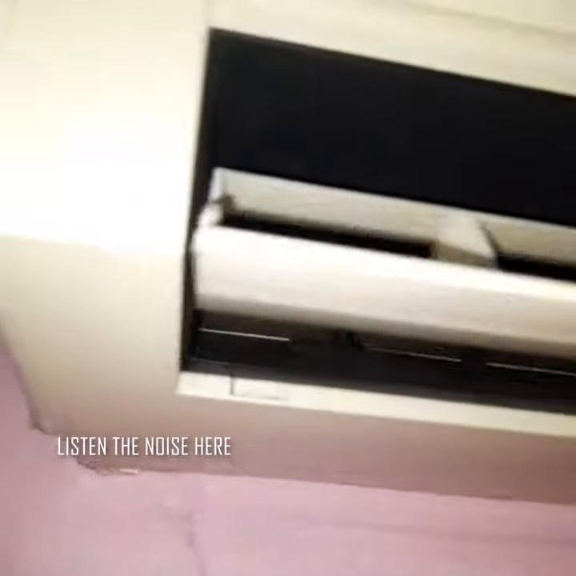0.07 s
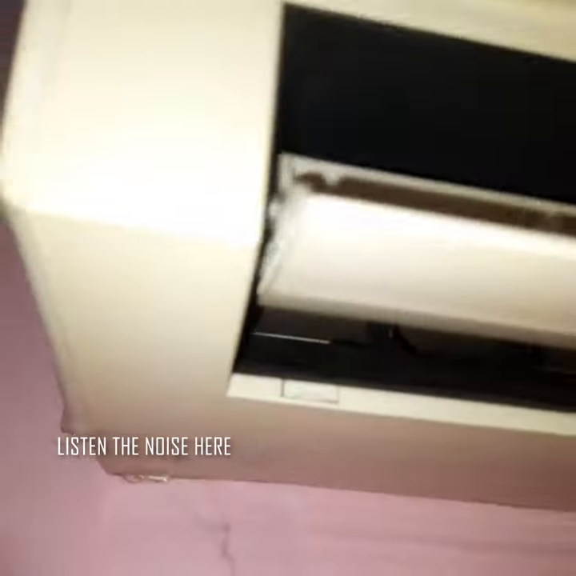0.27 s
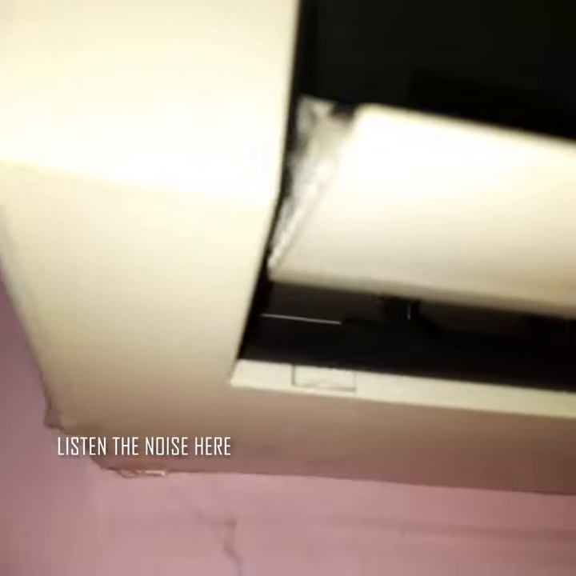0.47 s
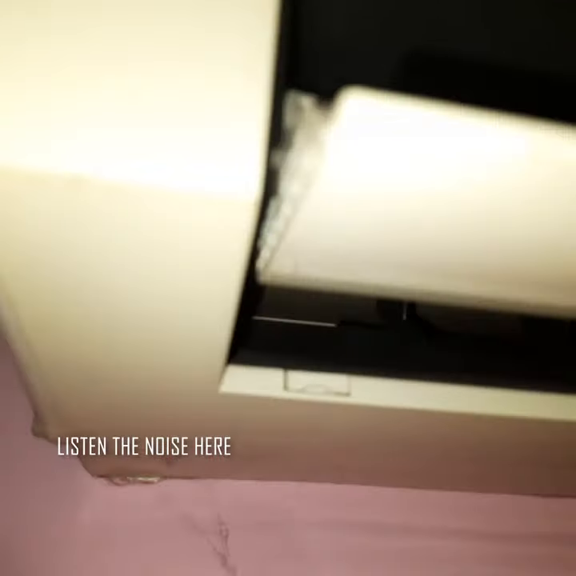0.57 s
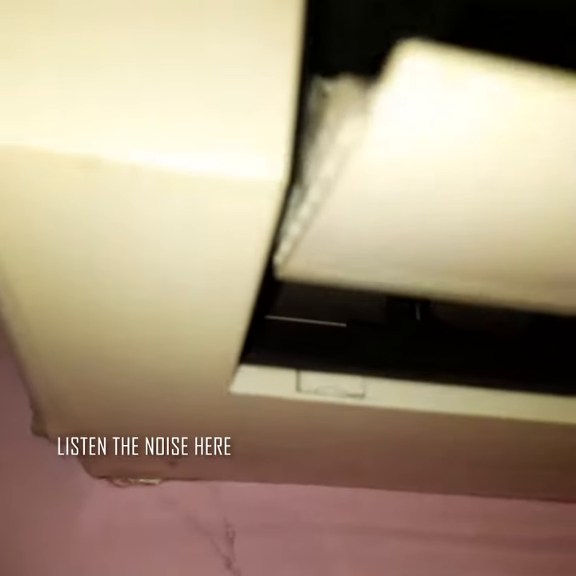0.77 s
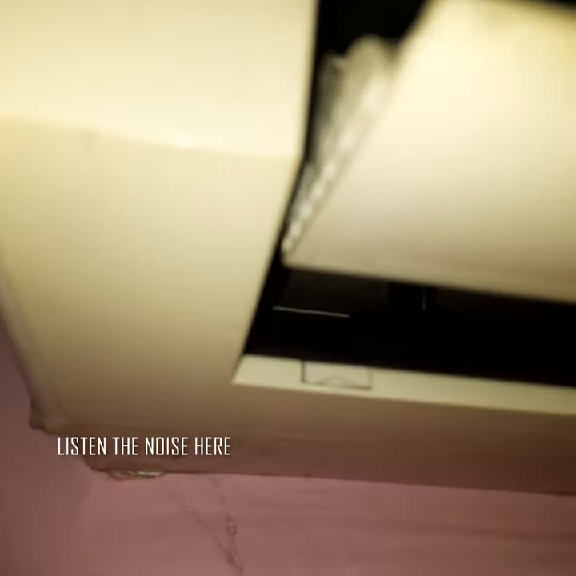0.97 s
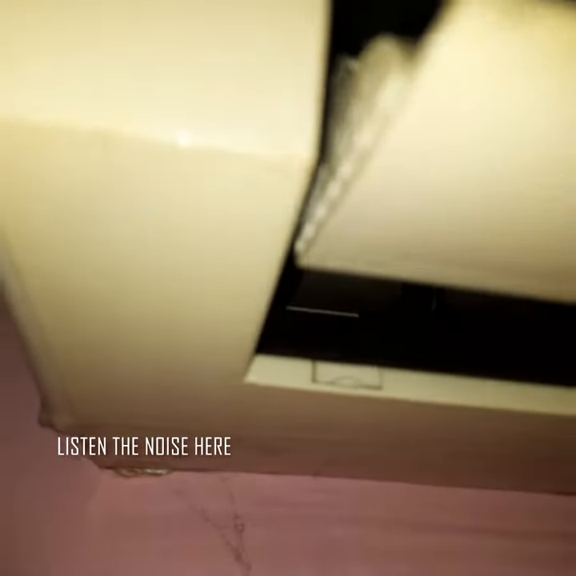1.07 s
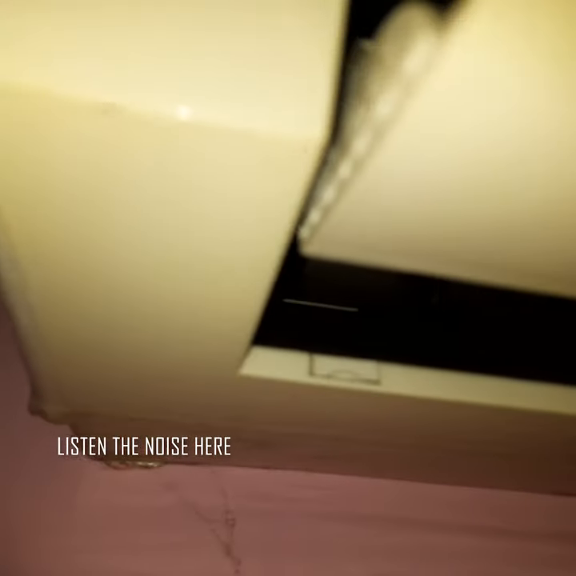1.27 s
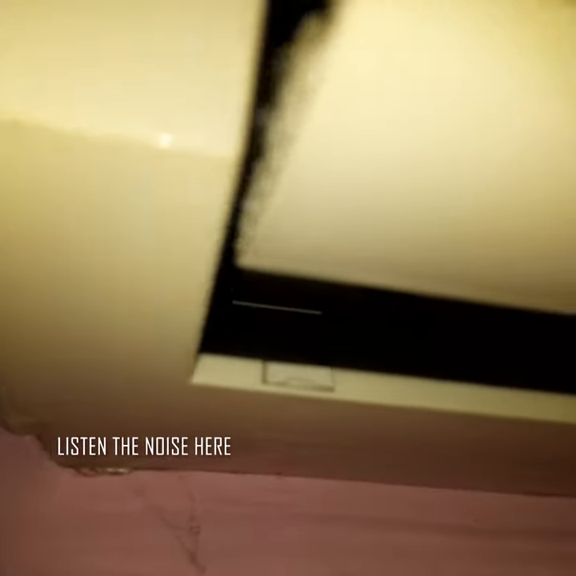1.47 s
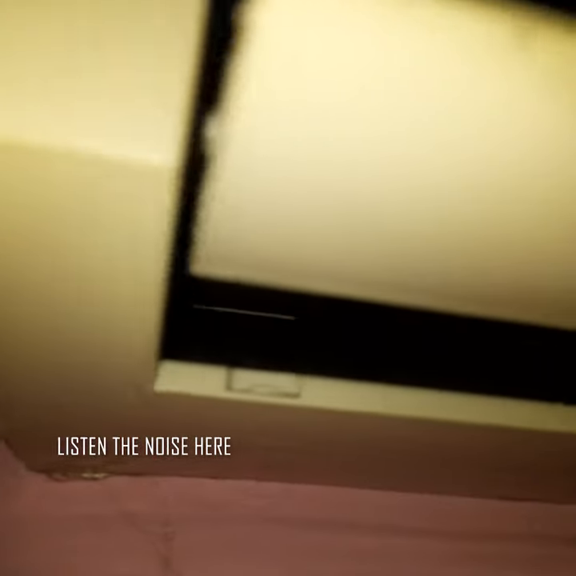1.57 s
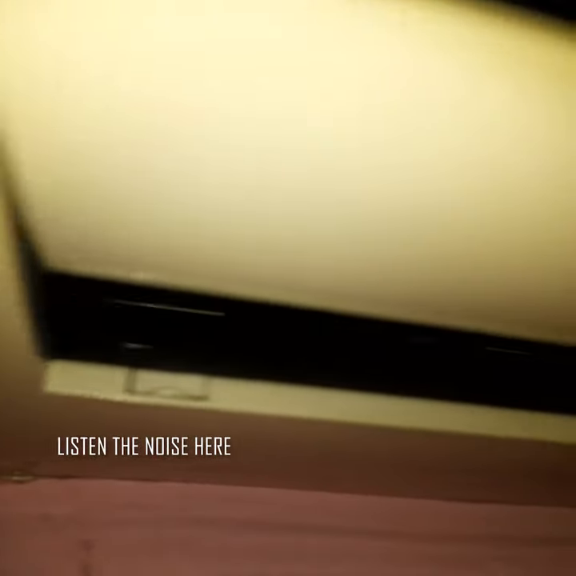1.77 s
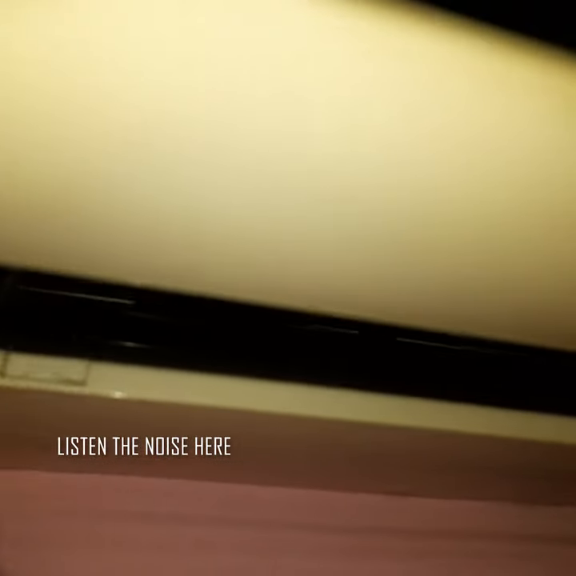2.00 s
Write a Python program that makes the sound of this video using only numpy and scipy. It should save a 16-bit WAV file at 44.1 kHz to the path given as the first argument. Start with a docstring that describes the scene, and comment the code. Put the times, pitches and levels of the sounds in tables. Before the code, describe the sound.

Airflow from a wall air conditioner hisses and rumbles as its closing louver ticks faintly.

```python
"""Air conditioner louver closing

A phone sits close to the outlet of a wall air conditioner while its louver swings shut.
The fan's air hisses and its housing drones. The draught hits the two microphone openings
(ports) separately, so each rumbles and flutters; the phone's wind filter briefly cuts the
bass at times. The louver's plastic gear ticks faintly."""
import sys
import numpy as np
from scipy import signal
from scipy.fft import rfft, irfft
from scipy.io import wavfile
from scipy.ndimage import uniform_filter1d

SR = 44100
rng = np.random.default_rng(int(sys.argv[2]) if len(sys.argv) > 2 else 0)


def put_to_file(sound):
    """Save the sound as 16-bit audio at rate SR, in the file named by the first command-line argument."""
    columns = np.atleast_2d(sound).T  # one column per channel
    safe = np.clip(columns, -1, 1)
    whole_steps = np.round(safe * 32767)
    wavfile.write(sys.argv[1], SR, whole_steps.astype(np.int16))


N = 89875
PORT_LAG_S = .0005  # sound reaches the left port this much later


def gain(db):
    return 10 ** (np.asarray(db) / 20)


def curve(table, column=1):
    """Join a table's points with straight lines over time."""
    table = np.array(table, float)
    return np.interp(np.arange(N) / SR, table[:, 0], table[:, column])


def colour(noise, tone):
    """Give noise the tone of an (f/Hz, level/dB) table, at an average (rms) size of 1."""
    tone, hz = np.array(tone, float), np.arange(N // 2 + 1) * SR / N + 1
    level_db = np.interp(np.log(hz), np.log(tone[:, 0]), tone[:, 1], left=-60)
    shaped = irfft(rfft(noise) * gain(level_db), N)
    return shaped / np.sqrt(np.mean(shaped ** 2))


def wobble(per_s, channels=2):
    """Glide between random values, roughly -1 to 1, per_s times a second."""
    hold = int(SR / per_s)
    steps = np.repeat(rng.standard_normal((channels, N // hold + 1)), hold, axis=1)
    return 1.1 * uniform_filter1d(uniform_filter1d(steps, hold), hold)[:, :N]


def stereo_noise(shared, lag_s):
    """Left and right noise with a shared part that comes lag_s later on the left."""
    both, own = rng.standard_normal(N), rng.standard_normal((2, N))
    common = np.array([np.roll(both, int(lag_s * SR)), both])
    return np.sqrt(shared) * common + np.sqrt(1 - shared) * own


def add(out, start_s, sound):
    """Mix a sound in at start_s."""
    i = max(int(start_s * SR), 0)
    out[..., i:i + sound.shape[-1]] += sound[..., :N - i]


def pan(db):
    """Two gains that make the left db louder than the right."""
    return gain(np.array([db, -db]) / 2)


# Tone of the hiss: f/Hz, level/dB
HISS_TONE = [(300, -30), (600, -4), (900, 0), (1300, -7), (2000, -10), (3100, -15), (3500, -23),
             (4500, -23), (5800, -27.5), (7000, -29.5), (8200, -34), (9200, -43), (10200, -49),
             (15800, -50)]
# How loud the hiss is: t/s, level/dB
HISS_LEVEL = [(0, -51.5), (.3, -48.5), (.9, -47), (1.4, -47), (1.55, -44.5), (1.8, -42.5), (2.04, -44)]

def air_hiss(treble_hz=6500, left_cut_db=4):
    """The fan's air hisses out of the outlet, a little duller on the left."""
    noise = stereo_noise(shared=.35, lag_s=PORT_LAG_S)
    flicker_db = 1.24 * wobble(30.1, channels=1) + 2.0 * wobble(180)
    hiss = colour(noise * gain(flicker_db), HISS_TONE)
    treble = signal.butter(2, treble_hz * np.array([.6, 1.35]), "bandpass", fs=SR, output="sos")
    hiss[0] -= (1 - gain(-left_cut_db)) * signal.sosfiltfilt(treble, hiss[0])
    return hiss * gain(curve(HISS_LEVEL))


# Tone of the fan housing: f/Hz, level/dB
HOUSING_TONE = [(200, -20), (260, -6), (325, 0), (390, -5), (480, -10), (700, -18), (810, -12), (920, -22),
                (2000, -100)]
# How loud it drones: t/s, level/dB
HOUSING_LEVEL = [(0, -46), (.5, -48), (.78, -44), (.85, -46), (.905, -40), (.95, -45), (1.3, -43.5),
                 (1.52, -43), (2.04, -42)]

def housing_drone():
    """The fan housing gives a hollow hum at a few hundred Hz, much alike on both sides."""
    noise = stereo_noise(shared=.81, lag_s=PORT_LAG_S)
    flicker_db = .42 * wobble(40.8, channels=1)
    return colour(noise * gain(flicker_db), HOUSING_TONE) * gain(curve(HOUSING_LEVEL))


# Tone of the rumble: f/Hz, level/dB
RUMBLE_TONE = [(20, -20), (35, -9), (55, -1), (110, 0), (180, -3.5), (240, -5), (290, -9), (380, -25),
               (800, -100)]
# How loud it is between dips: t/s, left level/dB, right level/dB
RUMBLE_LEVEL = [(0, -33, -20), (.12, -39, -33.5), (.3, -30, -32), (.5, -36.5, -39.5), (.62, -31.5, -36.5),
                (.85, -35, -41), (1.15, -33, -35), (1.3, -35.5, -28.5), (1.5, -31.5, -35),
                (1.66, -26.5, -27), (1.8, -28.5, -23.5), (1.88, -31, -26.5), (1.95, -49, -26),
                (2.04, -29, -17.5)]
# When the phone's wind filter cuts the bass: t/s, length/s, port (0 left, 1 right)
BASS_DIPS = [(0.034, 0.1, 0), (0.147, 0.041, 0), (0.18, 0.035, 0), (0.291, 0.11, 0), (0.516, 0.034, 0),
             (1.419, 0.031, 0), (1.676, 0.057, 0), (1.874, .108, 0), (0.536, 0.02, 1), (0.894, 0.065, 1),
             (1.17, 0.03, 1), (1.214, 0.044, 1), (1.3, 0.073, 1), (1.456, 0.011, 1), (1.497, .028, 1),
             (1.573, 0.03, 1)]

def draught_rumble(dip_db=-18, fade_s=.006):
    """The draught rumbles on each port; the phone's wind filter briefly cuts the bass now and then."""
    noise = stereo_noise(shared=.29, lag_s=0)
    lumps_db = 2.5 * wobble(65)
    rumble = colour(noise * gain(lumps_db), RUMBLE_TONE)
    dipping = np.zeros((2, N))
    for start_s, length_s, port in BASS_DIPS:
        add(dipping[port], start_s, np.ones(int(length_s * SR)))
    dipping = uniform_filter1d(np.minimum(dipping, 1), int(fade_s * SR))
    level_db = np.array([curve(RUMBLE_LEVEL, column=1), curve(RUMBLE_LEVEL, column=2)])
    return rumble * gain(level_db + dip_db * dipping)


# Tone of the swirling air: f/Hz, level/dB
SWIRL_TONE = [(170, -24), (240, -3), (340, 0), (480, -5.5), (650, -12.5), (1300, -25), (2500, -42),
              (5000, -90)]
# How loud it is: t/s, level/dB, left minus right/dB
SWIRL_LEVEL = [(0.0, -34, -2), (0.04, -36, 0), (0.07, -43, 6), (0.15, -41, 0), (0.2, -45, 0),
               (0.57, -45, 1), (0.8, -41, 0), (1.0, -43, 1), (1.36, -41, 1), (1.41, -37, 1),
               (1.445, -40, 0), (1.46, -50, 0), (1.48, -37, -2), (1.6, -38, 1), (1.74, -38, 3),
               (1.82, -34, 2), (1.88, -33.5, 8), (1.91, -38, 3), (1.94, -34.5, 6), (2.04, -36, 6)]

def swirl_flutter():
    """Small swirls in the draught flutter at a pitch above the rumble."""
    noise = stereo_noise(shared=.4, lag_s=.0001)
    flicker_db = .5 * wobble(70, channels=1) + .6 * wobble(98)
    swirls = colour(noise * gain(flicker_db), SWIRL_TONE)
    return swirls * gain(curve(SWIRL_LEVEL)) * pan(curve(SWIRL_LEVEL, column=2))


# Puffs of air: t/s, level/dB, left minus right/dB, f/Hz
AIR_PUFFS = [(.032, -36, 5, 870), (.068, -42.5, -5, 890), (.084, -34.5, 5, 1070), (0.09, -41, 8, 1670),
             (.121, -40, -8, 870), (.162, -37.5, -1.5, 726), (.841, -48, 8, 1300), (0.876, -41.5, -4, 850),
             (.892, -40.5, 5, 940), (1.361, -37.5, 4, 1180), (1.527, -41.5, 1, 1480),
             (1.846, -27.5, 3, 495), (1.868, -25.5, 11, 510), (1.886, -30, 8, 950),
             (1.918, -29.5, 5.5, 530), (1.941, -29.5, 13.5, 640), (1.955, -33.5, 5, 1060),
             (2.01, -29.5, 16, 730)]

def puffs(rise_s=.0045):
    """Air brushes across a port's edge in short, rough bursts."""
    out, t = np.zeros((2, N)), np.arange(int(.018 * SR)) / SR
    swell = t / rise_s * np.exp(1 - t / rise_s)
    for at_s, db, pan_db, hz in AIR_PUFFS:
        band = signal.butter(1, hz * np.array([.4, 1.8]), "bandpass", fs=SR, output="sos")
        puff = signal.sosfilt(np.vstack([band] * 3), rng.standard_normal((2, len(t))))
        puff /= np.sqrt(2) * puff.std()
        add(out, at_s - .003, gain(db) * puff * swell * pan(pan_db)[:, None])
    return out


# Thumps of air: t/s, level/dB, f/Hz, port (0 left, 1 right)
AIR_THUMPS = [(0.036, -14, 136, 0), (.115, -16, 97, 1), (0.117, -26.5, 115, 0), (0.156, -16.5, 157, 1),
              (0.168, -17.5, 211, 0), (0.213, -20, 114, 0), (0.274, -22, 96.5, 0), (0.396, -25.5, 113, 0),
              (0.423, -28, 135, 1), (0.483, -25, 97, 1), (0.551, -24, 98.6, 0), (0.588, -29, 138, 0),
              (0.609, -20.5, 161, 1), (0.607, -26, 129, 0), (0.679, -22, 111, 1), (0.681, -24.5, 95.5, 0),
              (0.762, -28, 131, 0), (.762, -23.5, 138, 1), (.816, -27, 198, 1), (0.93, -26.5, 112, 0),
              (1.056, -31, 124, 1), (1.155, -25, 106, 0), (1.156, -24.5, 118, 1), (1.382, -24, 98, 0),
              (1.401, -22.5, 227, 1), (1.49, -31, 131, 1), (1.568, -36, 112, 1), (1.575, -21, 124, 0),
              (1.645, -21, 159, 0), (1.741, -20.5, 110, 1), (1.762, -24.5, 101, 0), (1.804, -15.5, 115, 1),
              (1.802, -18.5, 109, 0), (1.817, -18, 96, 0), (1.821, -22, 120, 1), (1.851, -24.5, 145, 1),
              (1.862, -22, 139, 0), (1.864, -12, 110, 1), (1.879, -18, 87, 1), (1.881, -23.5, 91, 0),
              (1.893, -16, 100, 1), (2.012, -20, 134, 1), (2.02, -29, 109, 0), (2.025, -41, 88, 1)]

def thumps(width_cycles=.36):
    """The draught shoves one port: a single low swing of pressure."""
    out = np.zeros((2, N))
    phases = .018 * rng.standard_normal(len(AIR_THUMPS))
    for (at_s, db, hz, port), phase in zip(AIR_THUMPS, phases):
        cycles = np.arange(-1.5 * SR / hz, 1.5 * SR / hz) * hz / SR
        swell = np.exp(-.5 * (cycles / width_cycles) ** 2)
        wave = np.sqrt(2) * np.sin(2 * np.pi * (cycles + phase))
        add(out[port], at_s - 1.57 / hz, gain(db) * swell * wave)
    return out


def ring(push, hz, ring_s):
    """A pushed part rings at one pitch, fading 60 dB in ring_s; its peak is 1."""
    decay = np.exp(-np.log(1000) / (ring_s * SR))
    feedback = [1, -2 * decay * np.cos(2 * np.pi * hz / SR), decay * decay]
    note = signal.lfilter([1, 0, -1], feedback, push)
    return note / np.abs(note).max()


# Slips of the gear: t/s, level/dB, boost for the flap's edge/dB
GEAR_SLIPS = [(0.101, -66, -11), (0.3703, -51, 7), (0.5382, -57, -10), (0.5546, -57, 4), (0.675, -53, -6),
              (0.6953, -51.5, -16), (0.7841, -50, -14), (0.834, -62, 16.5), (.973, -61, -12),
              (1.03, -62, -8), (1.067, -52, 4), (1.1109, -52, 4), (1.2321, -57, 9), (1.362, -52.5, -8),
              (1.5672, -44.5, 3), (1.7602, -42, 3.5), (1.9495, -49.5, 14.5)]
# Notes the flap's body rings at: f/Hz, level/dB, ring time/s
FLAP_NOTES = [(1200, 5, .015), (2000, 4, .012), (2700, 1.5, .01), (3400, -4, .008), (4600, -3.5, .008),
              (5600, -10, .004), (7100, -9, .004), (8100, -11, .004), (10500, -29, .003)]

def louver_ticks(scrape_s=.0055, snap_s=.002, low_delay_s=.003, top_hz=10000):
    """Each gear slip snaps the louver flap's edge and scrapes its body, whose lower notes come late."""
    out, t = np.zeros((2, N)), np.arange(int(.08 * SR)) / SR
    for slip_s, db, edge_db in GEAR_SLIPS:
        *own_scrape, shared_scrape, snap = rng.standard_normal((4, len(t))) * np.exp(-t / scrape_s)
        edge = gain(edge_db - 3) * ring(snap * np.exp(-t / snap_s), hz=6390, ring_s=.009)
        for port, at_s in enumerate([slip_s + PORT_LAG_S, slip_s]):
            add(out[port], at_s, gain(db) * edge)
            for hz, note_db, ring_s in FLAP_NOTES:
                note = ring(own_scrape[port] + shared_scrape, hz, ring_s)
                if hz < 3000:  # a second pass makes the lowest notes purer
                    note = ring(note, hz, ring_s / 2)
                add(out[port], at_s + low_delay_s * (hz < 5000), gain(db + note_db) * note)
    return signal.sosfilt(signal.butter(2, top_hz, fs=SR, output="sos"), out)


def scene():
    """The fan, its draught on the ports and the louver, all together."""
    fan = air_hiss() + housing_drone()
    draught = draught_rumble() + thumps() + swirl_flutter() + puffs()
    return fan + draught + louver_ticks()


def record(dry):
    """The phone cuts off the highest treble."""
    top_hz = 15700
    return signal.sosfilt(signal.ellip(10, .2, 80, top_hz, fs=SR, output="sos"), dry)


dry = scene()
out = record(dry)
put_to_file(out)
```